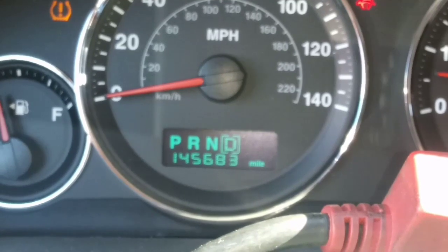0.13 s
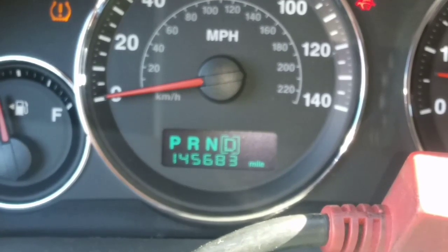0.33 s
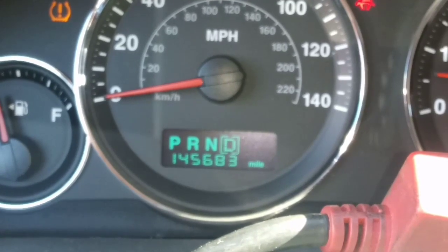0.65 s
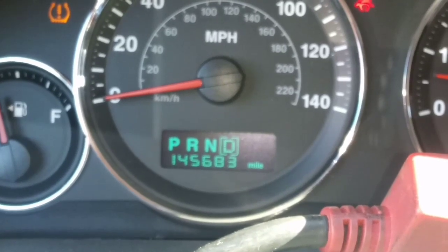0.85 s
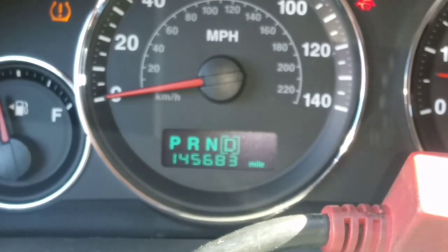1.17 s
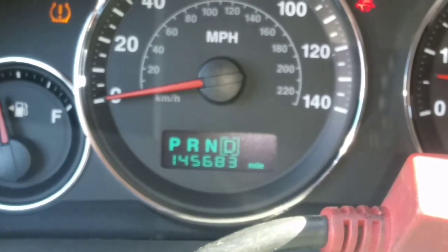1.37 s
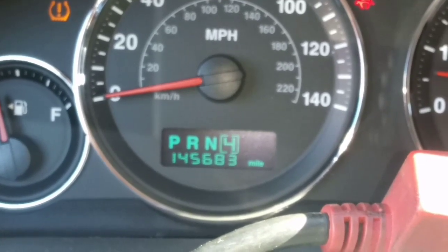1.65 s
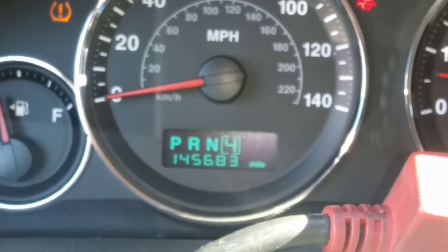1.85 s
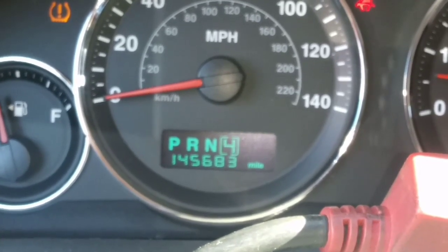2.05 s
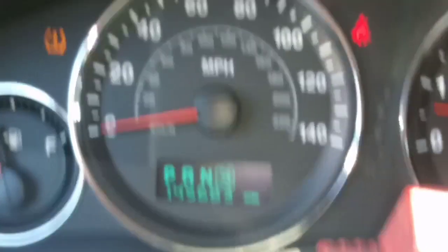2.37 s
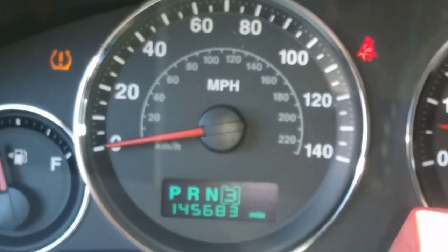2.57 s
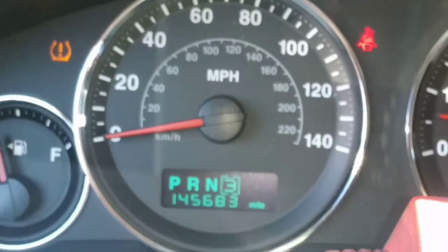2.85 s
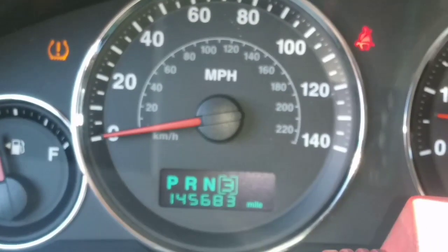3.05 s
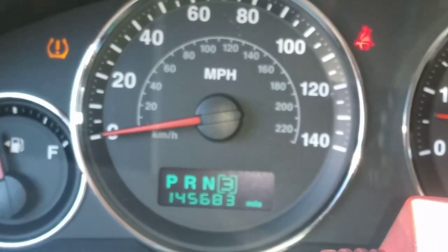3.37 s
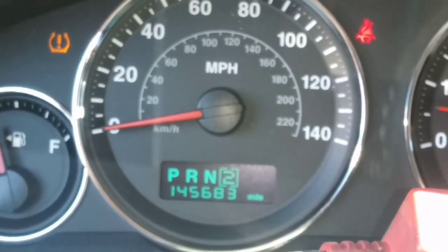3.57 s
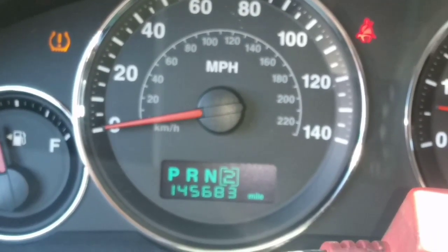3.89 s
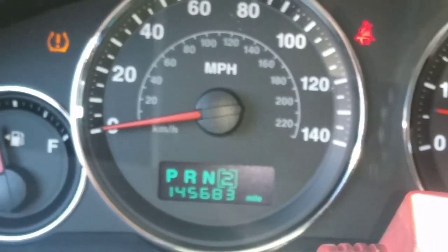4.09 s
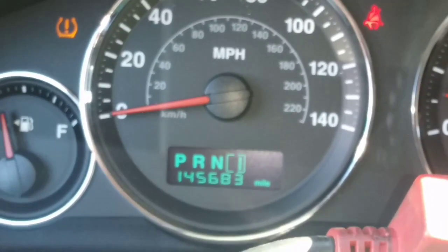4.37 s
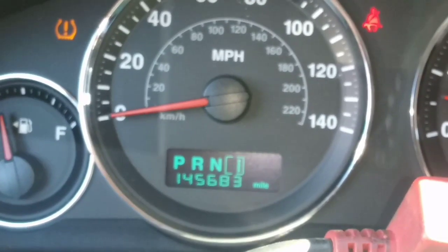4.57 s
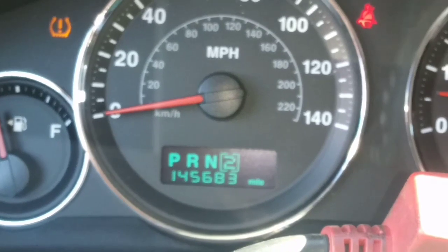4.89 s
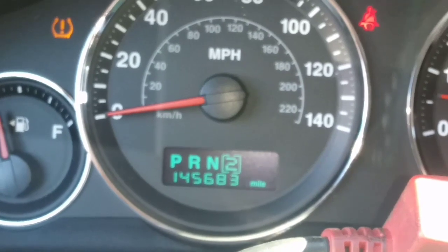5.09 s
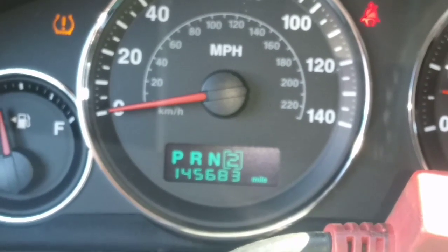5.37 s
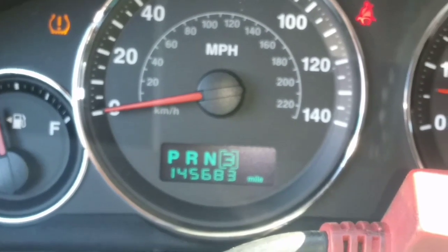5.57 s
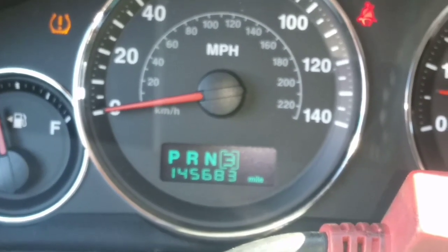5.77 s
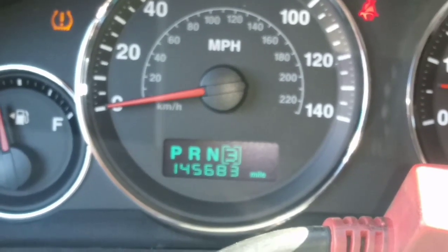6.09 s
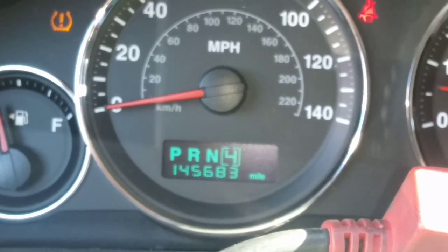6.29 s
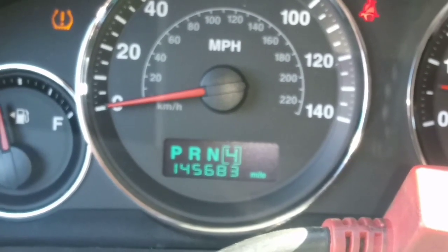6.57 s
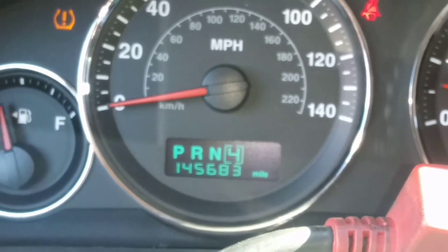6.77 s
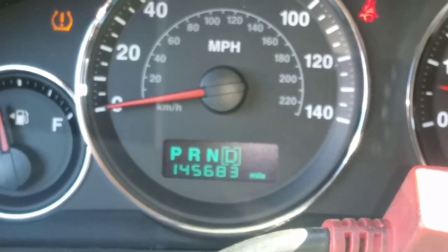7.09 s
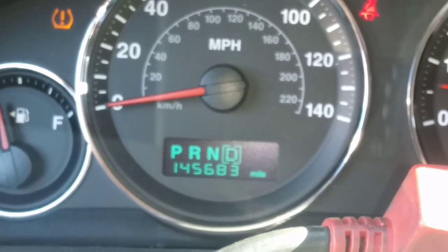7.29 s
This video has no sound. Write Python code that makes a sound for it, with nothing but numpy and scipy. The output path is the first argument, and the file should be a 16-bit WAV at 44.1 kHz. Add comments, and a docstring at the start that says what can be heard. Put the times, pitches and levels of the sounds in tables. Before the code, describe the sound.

Close to the console of an idling car, after a second of quiet low hum, a shifter makes eight double clacks at uneven gaps of roughly half a second to over a second. Each is a crisp snap, then a rattling return that knocks the floor and loose trim. Small taps and faint rubs fall between; the later clicks are lighter, and the hum carries on to the end.

```python
"""Inside an idling car, the gear lever is pushed over its detent eight times, springing back after each push.
Before each push the sprung detent rasps over a notch in tiny slips; then steel spring and plastic console click
together as filtered noise bursts. The lever springs back into its seat, clatters, rebounds and rocks, booming
the floor's decaying sines, with trim rattle and soft rubs, and a faint high whine from the recorder. The small
cabin answers briefly over unsteady engine tones, a stirring rush and a faint hiss."""
import sys
import numpy as np
from scipy import signal
from scipy.fft import rfft, irfft, next_fast_len
from scipy.io import wavfile
from scipy.ndimage import uniform_filter1d, map_coordinates

SR = 44100
rng = np.random.default_rng(int(sys.argv[2]) if len(sys.argv) > 2 else 0)


def unload_audio(sound):
    """Save the sound as a 16-bit wav file, at the path given as the first command line argument."""
    columns = np.transpose(np.atleast_2d(sound))
    # keep every value between -1 and 1, then stretch to whole-number steps
    steps = np.round(np.clip(columns, -1, 1) * 32767)
    wavfile.write(sys.argv[1], SR, steps.astype(np.int16))


N = 328146  # length [samples]
BINS = np.fft.rfftfreq(4096, 1 / SR)  # frequency grid for body responses [Hz]
LEAD_S = 0.04  # swell before each snap [s]

# The lever is pushed over its detent and on to the end stop:
# (time [s], detent spring level [dB], slack tick lead [s], slack tick spring level [dB], console clack level [dB],
#  favoured resonance [Hz], brightness [dB per octave], rebound level re the click [dB],
#  floor thump level before the low cut [dB], travel to the stop [s], stop thump level before the low cut [dB])
PUSH_EVENTS = [(1.366, -16, 0.025, -39, -1, 980, 1, -19, -36.5, .03, -44),
               (1.9904, -12.5, 0.021, -37.5, -1, 1190, 1, -2.5, -19, .039, -31.5),
               (3.261, -10.5, .009, -42, -5, 1220, 1, -5, -28, .049, -29.5),
               (3.964, -11, .010, -37, 0.5, 1090, 0.5, -9.5, -26.5, .041, -31),
               (4.693, -21.5, 0.018, -34.5, -8.5, 715, -1.5, -2.5, -31.5, 0.037, -26.5),
               (5.369, -27, 0.027, -41, -11, 1200, 1, -3.5, -26, 0.0257, -26.5),
               (5.9634, -26, .027, -45, -10.5, 700, 1, 0, -28.5, 0.025, -26.5),
               (6.753, -22.5, 0.026, -48, -9, 880, 1, -3, -26, 0.02, -26)]
# The lever springs back, touches its seat, hits home, rebounds and rocks out:
# (first touch time [s], hit spring level [dB], slack tick lead [s], slack tick spring level [dB],
#  hit clack level [dB], favoured resonance [Hz], hit delay after touch [s], rebound delay after touch [s],
#  rebound level re the hit [dB], first and second floor thump levels before the low cut [dB, dB],
#  floor pitch ratio [-], rocking period [s], first rock level before the low cut [dB])
RETURN_EVENTS = [(1.502, -26, .007, -30, -6.5, 1200, 0.0082, .022, -1.5, -15.5, -23.5, 0.95, .027, -28.5),
                 (2.114, -25.5, 0.019, -41, -6.5, 600, 0.0082, 0.025, 1, -19, -19, 0.83, .044, -29),
                 (3.403, -22, .009, -46, -4.5, 620, .013, 0.027, 0, -16.5, -16.5, 0.83, .037, -32.5),
                 (4.104, -24.5, 0.013, -38.5, -5.5, 590, .010, .026, 2.5, -23, -17, 0.94, .044, -32),
                 (4.829, -25.5, .016, -43, -6.5, 1330, 0.0058, .029, -3.5, -15.5, -31, 0.95, .038, -28.5),
                 (5.501, -31.5, 0.021, -44, -11, 544, 0.0078, 0.028, -5.5, -25.5, -25, 0.876, .028, -29),
                 (6.112, -27, 0.021, -40, -9, 686, .008, 0.02, -2.5, -16.5, -38, 0.855, .03, -34.5),
                 (6.929, -27, .015, -39.5, -6, 615, .007, 0.023, -4, -15.5, -32, 1.0, .035, -38.5)]
# Light taps of the held lever:
# (time [s], console clack level [dB], detent spring level [dB], favoured resonance [Hz], brightness [dB per octave])
TAP_EVENTS = [(2.07, -21, -55, 845, -5), (3.002, -30.5, -41, 1900, 2), (3.116, -23.5, -40, 880, 1),
              (4.057, -26.5, -56, 970, -1.5)]
# the detent lands again, flicking its spring a little less
PUSH_REBOUND_S, PUSH_REBOUND_SPRING_DB = 0.0085, -3.5
# first touch of the seat: levels re the hit, resonance, brightness per octave
TOUCH_DB, TOUCH_SPRING_DB, TOUCH_HZ, TOUCH_TILT_DB = -2, -3, 760, 0
HIT_TILT_DB = 0  # brightness per octave
# the rebound is duller: extra spring level, resonance, brightness per octave
REBOUND_SPRING_DB, REBOUND_HZ, REBOUND_TILT_DB = -5.5, 670, -1
# taking up the play: console clack re its spring level, resonance, brightness per octave
SLACK_CLACK_DB, SLACK_HZ, SLACK_TILT_DB = 13.5, 620, -2.5


def contacts():
    """Every touch of lever and gate: (s, clack dB, spring dB, favoured Hz, brightness dB per octave)."""
    rows = list(TAP_EVENTS)
    for s, spring_db, _, _, db, hz, tilt_db, rebound_db, *_ in PUSH_EVENTS:
        landing_spring_db = spring_db + rebound_db + PUSH_REBOUND_SPRING_DB
        rows.append((s, db, spring_db, hz, tilt_db))
        rows.append((s + PUSH_REBOUND_S, db + rebound_db, landing_spring_db, hz, tilt_db))
    for s, spring_db, _, _, db, hz, hit_s, rebound_s, rebound_db, *_ in RETURN_EVENTS:
        bounce_spring_db = spring_db + rebound_db + REBOUND_SPRING_DB
        rows.append((s, db + TOUCH_DB, spring_db + TOUCH_SPRING_DB, TOUCH_HZ, TOUCH_TILT_DB))
        rows.append((s + hit_s, db, spring_db, hz, HIT_TILT_DB))
        rows.append((s + rebound_s, db + rebound_db, bounce_spring_db, REBOUND_HZ, REBOUND_TILT_DB))
    for s, _, slack_s, slack_db, *_ in PUSH_EVENTS + RETURN_EVENTS:
        rows.append((s - slack_s, slack_db + SLACK_CLACK_DB, slack_db, SLACK_HZ, SLACK_TILT_DB))
    return rows


# Resonances of the plastic console: (mean frequency [Hz], width [Hz], mean level [dB])
CONSOLE_MODES = [(253, 59, -6.5), (320, 55, 0.5), (451, 41, -7.5), (588, 37, 3.5), (757.5, 64, -1),
                 (735, 18, -5.5), (925, 41, -1), (1033, 60, -4), (1245, 47, -0.5), (1380, 71, -16),
                 (1512, 110, -8), (1636, 34, -11), (1918, 70, -5), (2110, 100, -15), (2460, 48, -36),
                 (2664, 57, -14.5), (3040, 90, -31.5)]


def console_clacks(favour_db=4, favour_octaves=0.4, detune=0.014):
    """Every contact rings the hollow plastic console; where it lands decides which modes speak most."""
    out = np.zeros(N)
    octave = np.log2(np.clip(BINS, 200, 4000))
    muffle = 1 / np.sqrt(1 + (BINS / 3100) ** 6)
    for s, db, _, hz, tilt_db in contacts():
        # the lever's load shifts each mode a little, and each contact feeds it differently
        modes = [(c * (1 + detune * rng.normal()), w, level + 2 * rng.normal()) for c, w, level in CONSOLE_MODES]
        body = peaks(modes, BINS) * muffle
        away = octave - np.log2(hz)
        colour = amp(tilt_db * away + favour_db * np.exp(-(away / favour_octaves) ** 2))
        force = chatter(t60=0.039, snap=0.12, swell_db=-7.0, swell_s=0.032, grain_db=2)
        add(out, s - LEAD_S, amp(db) * struck(force, body * colour))
    return out


# Broad ring of the detent spring: (frequency [Hz], relative gain [dB])
SPRING_COLOUR = [(1500, -46), (2800, 3.5), (3800, -7.5), (4700, -5.5), (5600, -1), (6400, 0.5),
                 (6900, -2.5), (7400, -4), (8200, -13.5), (9500, -13.5), (10700, -12.5), (12000, -19),
                 (15800, -16)]
# Narrow modes of the detent spring: (frequency [Hz], width [Hz], level at a flick of HARD_FLICK_DB [dB])
SPRING_MODES = [(2710, 88, 6.5), (5610, 56, -2), (6070, 72, 3.5), (6580, 70, 6.5), (6940, 170, 4)]
HARD_FLICK_DB = -21  # the narrow modes grow with the flick and take over above this


def detent_clicks(ring_growth=0.36):
    """The steel detent spring adds a bright, gritty tick; a hard flick rings its narrow modes more."""
    out = np.zeros(N)
    broad = amp(along(SPRING_COLOUR, BINS))
    for s, _, db, _, _ in contacts():
        narrow = amp(ring_growth * (db - HARD_FLICK_DB)) * peaks(SPRING_MODES, BINS)
        body = broad * np.hypot(1, narrow)
        force = chatter(t60=0.056, snap=0.17, swell_db=-6.5, swell_s=0.039, grain_db=2)
        add(out, s - LEAD_S, amp(db) * struck(force, body))
    return out


# The detent slides up a notch in a few slips:
# (time [s], length [s], first slip level [dB], last slip level [dB])
SCRAPE_EVENTS = [(1.266, 0.03, -26.5, -34.5), (1.927, .02, -36.5, -27), (2.925, 0.011, -38, -48),
                 (2.997, 0.012, -31, -42), (3.894, .035, -34, -50), (4.658, .016, -24.5, -18),
                 (5.331, .013, -24, -21.5), (5.921, 0.015, -29.5, -20.5), (6.691, .04, -32, -21.5)]


def slips(count=3):
    """Each scrape is a few evenly spaced slips that swell or fade: (s, dB)."""
    rows = []
    for s, length, first_db, last_db in SCRAPE_EVENTS:
        for u in np.linspace(0, 1, count):
            rows.append((s + u * length, first_db + u * (last_db - first_db)))
    return rows


# Resonances of the detent arm, before its broad colour: (frequency [Hz], width [Hz], level [dB])
ARM_MODES = [(1070, 90, 2), (1250, 140, 5.5), (1450, 130, -8), (1882, 71, 8.5), (2120, 81, -13),
             (2770, 140, -8.5), (3050, 92, -30)]


def detent_scrapes():
    """Tiny slips on the notch's flank make the detent arm rasp."""
    out = np.zeros(N)
    colour = amp(along([(400, -18.0), (1100, 1.0), (3200, -12), (6000, -8)], BINS))  # (Hz, dB)
    body = peaks(ARM_MODES, BINS) * colour
    for s, db in slips():
        force = chatter(t60=0.12, snap=0.082, swell_db=-8.5, swell_s=0.04, grain_db=0.0)
        add(out, s - LEAD_S, amp(db) * struck(force, body))
    return out


# The hand leans on the lever: (time [s], thump level before the low cut [dB], floor pitch ratio [-])
LEAN_EVENTS = [(2.973, -33.5, 1), (3.145, -35, 0.85), (3.184, -33, 1), (4.059, -34, 0.6)]
PUSH_PITCH, STOP_PITCH = 0.898, 0.9  # pitch ratio of the floor modes at the click and at the stop
# from the click, the first touch and the rebound to the floor's answer
PUSH_LAG_S, SEAT_LAG_S, REBOUND_LAG_S = 0.0045, 0.00997, 0.005
ROCK_LOSS_DB, ROCK_PITCH = -3.5, 0.943  # level change from rock to rock; pitch ratio of the floor modes
STOP_ROCK_S, STOP_ROCK_DB = 0.036, -9.5  # the lever rocks once against the end stop; level re the stop


def shoves(count=2):
    """Every shove of the lever against the floor, its rocking included: (s, dB, pitch ratio)."""
    rows = list(LEAN_EVENTS)
    for s, *_, thump_db, stop_s, stop_db in PUSH_EVENTS:
        rows.append((s + PUSH_LAG_S, thump_db, PUSH_PITCH))
        rows.append((s + stop_s, stop_db, STOP_PITCH))
        rows.append((s + stop_s + STOP_ROCK_S, stop_db + STOP_ROCK_DB, ROCK_PITCH))
    for s, *_, rebound_s, _, first_db, second_db, pitch, rock_s, rock_db in RETURN_EVENTS:
        landed = s + rebound_s + REBOUND_LAG_S
        rows.append((s + SEAT_LAG_S, first_db, pitch))
        rows.append((landed, second_db, pitch))
        for k in range(count):
            rows.append((landed + (k + 1) * rock_s, rock_db + k * ROCK_LOSS_DB, ROCK_PITCH))
    return rows


# Modes of the floor and cabin air: (frequency at pitch ratio 1 [Hz], relative level [dB], t60 [s])
FLOOR_MODES = [(63.4, -18, 0.1), (97.5, -0.5, 0.12), (130.6, 0, 0.11), (145.6, -3.5, 0.09),
               (252, -16, 0.12)]


def floor_thumps(rise_s=0.0067, low_hz=62):
    """The lever's weight shoves the floor, whose low modes boom in the cabin."""
    t, out = np.arange(SR // 3) / SR, np.zeros(N)
    for s, level_db, pitch in shoves():
        boom = sum(amp(db - 60 * t / t60) * np.sin(2 * np.pi * hz * pitch * t) for hz, db, t60 in FLOOR_MODES)
        boom = boom * (1 - np.exp(-t / rise_s))
        add(out, s, amp(level_db) * boom / abs(boom).max())
    low_cut = signal.butter(3, low_hz, "high", fs=SR, output="sos")
    return signal.sosfilt(low_cut, out)


# Colour of the loose trim: (frequency [Hz], relative level [dB])
TRIM_COLOUR = [(120, -41), (240, 2.5), (330, 2.5), (400, -1), (560, -5.5), (800, -8.5), (1200, -16),
               (2200, -36), (5000, -48.5)]


def trim_rattle(thumps, settle_s=0.0092):
    """Loose trim chatters while the floor shakes and settles just after it."""
    keep = np.exp(-1 / (settle_s * SR))
    shake = signal.lfilter([1 - keep], [1, -keep], abs(thumps))
    return amp(-18 + 3.8 * wobble(150)) * shake * noise(TRIM_COLOUR)


# Soft rubs of the lever and its boot:
# (centre time [s], level before the fade [dB], resonance [Hz], time from centre to a fade of e^-2 [s])
RUB_EVENTS = [(.68, -69, 663, 0.19), (1.617, -69.5, 976, 0.084), (3.046, -80, 6500, 0.035),
              (3.082, -80, 2660, 0.12), (3.107, -74, 7060, .017), (3.135, -56.5, 850, 0.029),
              (5.338, -58, 2720, .02), (5.919, -61, 1270, 0.03), (6.22, -58, 480, 0.064),
              (6.42, -75, 1330, 0.053), (6.711, -53, 1270, 0.018)]


def boot_rubs(relative_width=0.14):
    """Slow friction, as noise through one resonance at a time, murmurs up and away."""
    t, out = np.arange(-SR // 5, SR // 5) / SR, np.zeros(N)
    for s, db, hz, length in RUB_EVENTS:
        colour = peaks([(hz, relative_width * hz, 0)], BINS) ** 2
        rub = unit(signal.fftconvolve(rng.standard_normal(len(t)), ring(colour))[:len(t)])
        add(out, s + t[0], amp(db) * rub * np.exp(-2 * (t / length) ** 2))
    return out


# Decay of the upholstered cabin: (frequency [Hz], t60 [s])
CABIN_DECAY = [(100, 0.25), (400, 0.29), (900, 0.1), (1500, 0.11), (4000, .1), (12000, 0.046)]


def cabin(x, count=16):
    """A short, diffuse answer of decaying noise whose pattern changes smoothly through the scene."""
    out, step = np.zeros(N), N // count + 1
    for centre in range(0, N + step, step):
        hz, t, z = signal.stft(rng.standard_normal(SR // 3), SR, nperseg=256)
        decay = amp(-60 * t / along(CABIN_DECAY, hz)[:, None])
        tail = signal.istft(z * decay, SR, nperseg=256)[1]
        span = np.arange(max(centre - step, 0), min(centre + step, N))
        faded = x[span] * np.cos(np.pi / 2 * (span - centre) / step)  # crossfade between patterns
        # the answer starts 4 ms late
        add(out, span[0] / SR + 0.004, signal.fftconvolve(faded, tail / np.linalg.norm(tail)))
    return out


# Engine tones: (multiple of CRANK_HZ [-], mean peak level [dB])
IDLE_ORDERS = [(3, -64.5), (4, -63), (5, -63), (6, -67.5), (7, -59.5), (9, -60.5), (10, -60.5), (14.5, -67)]
# Engine and fan through the bulkhead: (frequency [Hz], relative level [dB])
HUM_COLOUR = [(15, -14), (35, -1.5), (70, 1), (140, 2), (175, -9.5), (290, -9.5), (380, -16.5),
              (460, -14.5), (540, -19), (700, -19.5), (900, -26.5), (1400, -30.5), (2000, -39),
              (3000, -44.5), (4500, -70)]
# Faint hiss: (frequency [Hz], relative level [dB])
HISS_COLOUR = [(1760, -29), (3000, -3.5), (4230, -4.5), (6670, -3.5), (8050, -8), (9870, -10.5),
               (11400, -7), (13600, -10.5), (15100, -3.5), (16000, -10.5)]
CRANK_HZ = 14.8  # mean firings a second of one cylinder bank
HUM_DB, HISS_DB = -53.5, -86.5  # rms


def idle():
    """Low engine orders, each a little unsteady, over a gently stirring rush and a faint hiss."""
    turns = CRANK_HZ * (np.arange(N) / SR + 0.0014 * wobble(1.42))  # the engine runs slightly ahead or behind
    orders = sum(amp(db + 1.4 * wobble(2.8)) * np.sin(2 * np.pi * (k * turns + rng.random()))
                 for k, db in IDLE_ORDERS)
    rush = amp(HUM_DB) * patchy(noise(HUM_COLOUR), depth_db=1.5)
    hiss = amp(HISS_DB) * noise(HISS_COLOUR)
    return orders + rush + hiss


def recorder_whine(thumps, hz=3935):
    """The recorder adds faint high whistles either side of 3.9 kHz and its multiples, following each boom."""
    phase = 2 * np.pi * hz * np.arange(N) / SR
    carriers = sum(amp(db) * np.sin((k + 1) * phase) for k, db in enumerate([-48, -53, -57]))
    return thumps * carriers


def chatter(t60, snap, swell_db, swell_s, grain_db):
    """Contact force: friction swells into a sharp snap, then the loose parts buzz out."""
    lead = round(LEAD_S * SR)
    t = np.arange(-lead, SR // 8) / SR
    shape = np.where(t < 0, amp(swell_db - 60 * abs(t) / swell_s), amp(-60 * abs(t) / t60))
    clumps = amp(grain_db * unit(uniform_filter1d(rng.standard_normal(len(t)), size=40)))
    force = shape * clumps * rng.standard_normal(len(t))
    force /= np.linalg.norm(force)
    force[lead] += snap
    return force


def peaks(modes, f):
    """Gain of a set of (Hz, width Hz, dB) resonances, summed in power."""
    return np.sqrt(sum(abs(amp(db) * f * w / (c * c - f * f + 1j * f * w)) ** 2 for c, w, db in modes))


def ring(gain):
    """Causal (minimum-phase) impulse response of energy 1 with the given gain shape on the BINS grid."""
    cepstrum = irfft(np.log(np.maximum(gain, 1e-6)))
    half = len(cepstrum) // 2
    # fold the cepstrum forward in time
    cepstrum[1:half] *= 2
    cepstrum[half + 1:] = 0
    response = irfft(np.exp(rfft(cepstrum)))
    return response / np.linalg.norm(response)


def struck(force, gain):
    """A body's answer to a force, scaled to energy 1."""
    sound = signal.fftconvolve(force, ring(gain))
    return sound / np.linalg.norm(sound)


def patchy(x, depth_db):
    """Let each stretch of the spectrum swell and fade on its own; rms 1."""
    z = signal.stft(x, nperseg=1024)[2]
    field = uniform_filter1d(rng.standard_normal(z.shape), size=4, axis=0)  # across frequency
    field = uniform_filter1d(field, size=10, axis=1)  # across time
    return unit(signal.istft(z * amp(depth_db * unit(field)), nperseg=1024)[1][:N])


def noise(spectrum):
    """Noise of rms 1 with the given colour."""
    return unit(filtered(rng.standard_normal(N), lambda hz: amp(along(spectrum, hz))))


def filtered(x, response):
    """x through a response given as a function of frequency."""
    size = next_fast_len(N + SR // 2)
    return irfft(rfft(x, size) * response(np.fft.rfftfreq(size, 1 / SR)), size)[:N]


def wobble(rate):
    """A smooth random curve, rate knots a second."""
    return map_coordinates(rng.standard_normal(int(N * rate / SR) + 4), [np.arange(N) * rate / SR])


def along(points, hz):
    """(Hz, value) points read on a log axis."""
    f, v = np.transpose(points)
    return np.interp(np.log(hz + 1), np.log(f + 1), v)


def amp(db):
    """Decibels to gain."""
    return 10 ** (np.asarray(db) / 20)


def unit(x):
    """Scale to rms 1."""
    return x / np.sqrt(np.mean(x ** 2) + 1e-20)


def add(track, s, sound):
    """Mix a sound into the track at time s."""
    part = track[round(s * SR):][:len(sound)]
    part += sound[:len(part)]


def scene():
    """The lever, its echo in the cabin, the idling engine and the recorder's whine."""
    clicks = console_clacks() + detent_clicks()
    scrapes = detent_scrapes()
    thumps = floor_thumps()
    echo = cabin(amp(-14.0) * clicks + amp(-16) * scrapes + amp(-14.5) * thumps)
    lever = clicks + scrapes + boot_rubs() + thumps + trim_rattle(thumps)
    return (lever + echo + idle() + recorder_whine(thumps))[None]


TOP_HZ = 15900  # band limit


def record(dry):
    """The recorder keeps nothing above its band limit."""
    return filtered(dry[0], lambda hz: hz < TOP_HZ)[None]


dry = scene()
out = record(dry)
unload_audio(out)
```